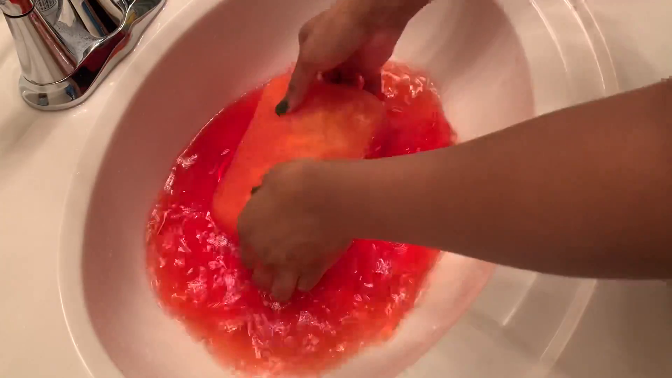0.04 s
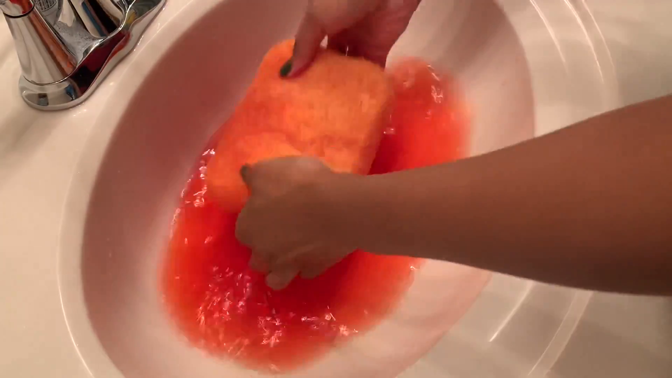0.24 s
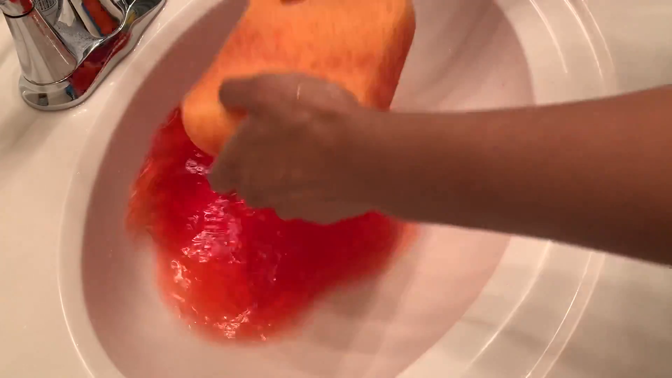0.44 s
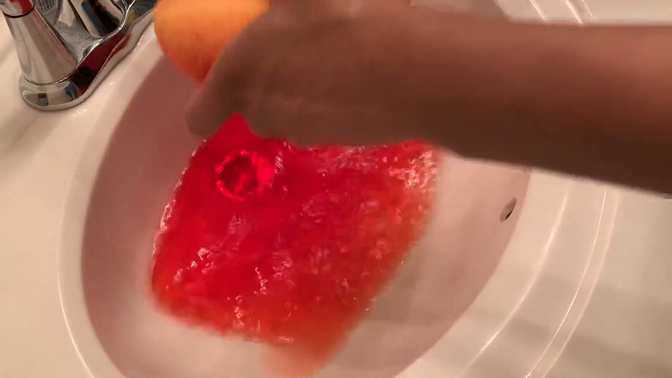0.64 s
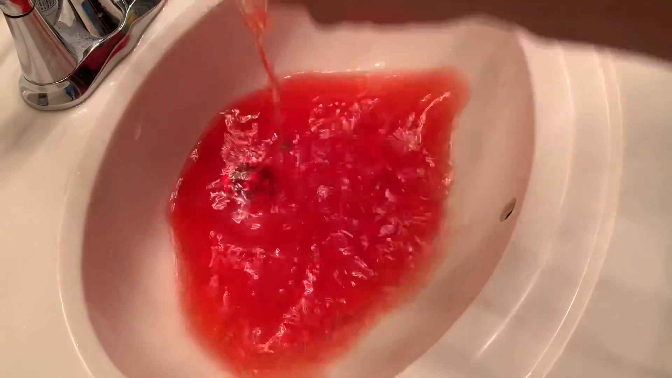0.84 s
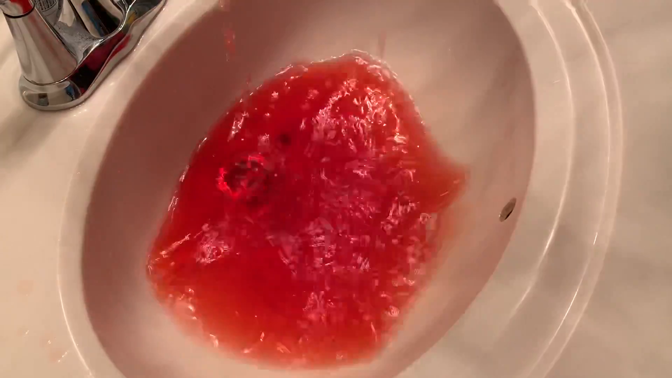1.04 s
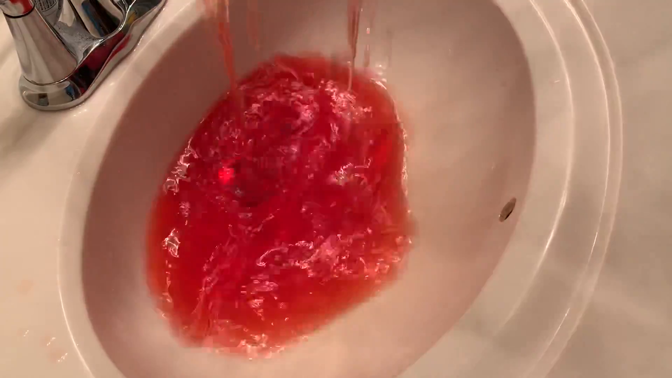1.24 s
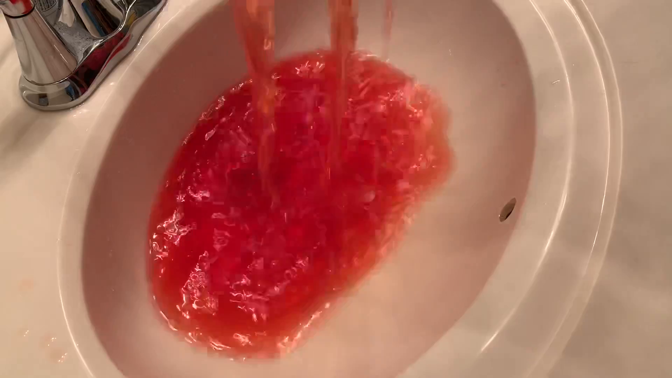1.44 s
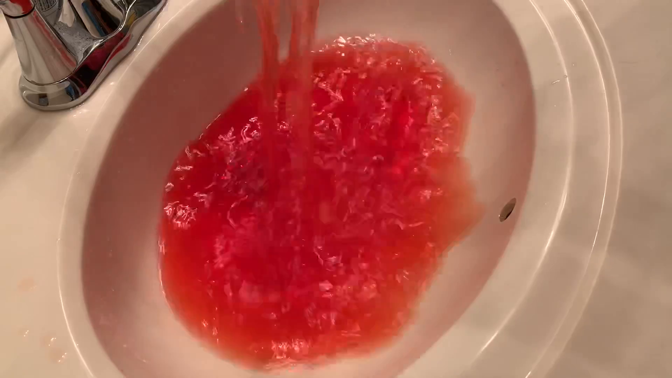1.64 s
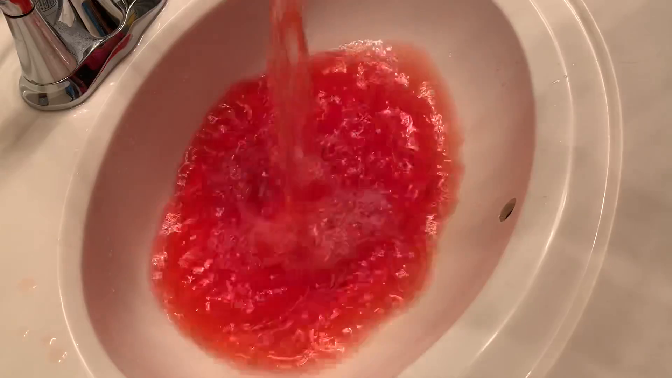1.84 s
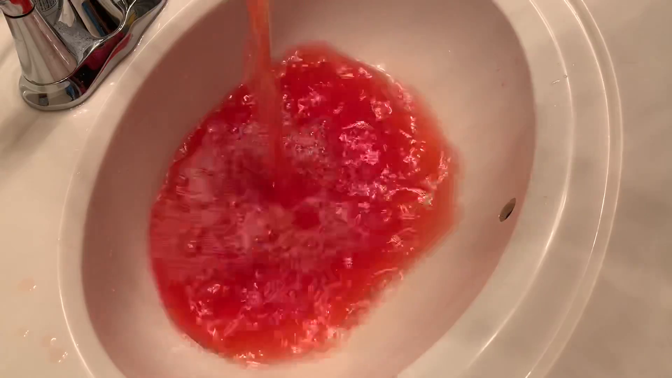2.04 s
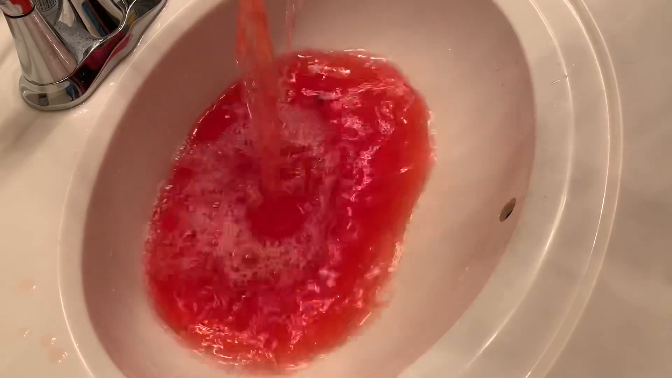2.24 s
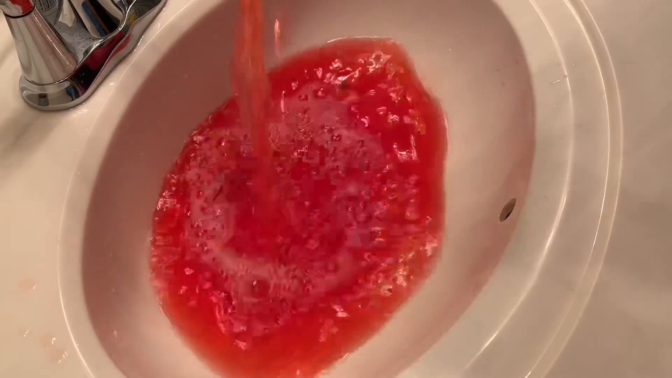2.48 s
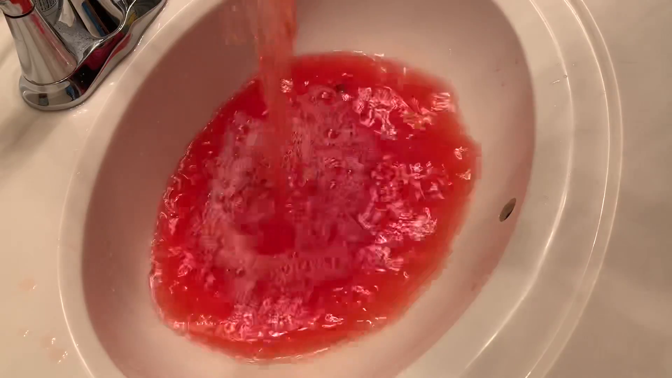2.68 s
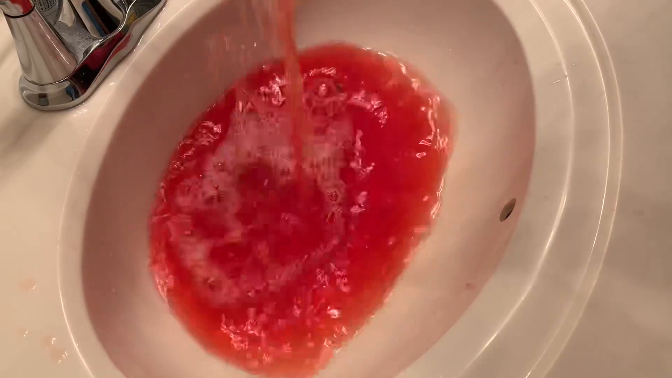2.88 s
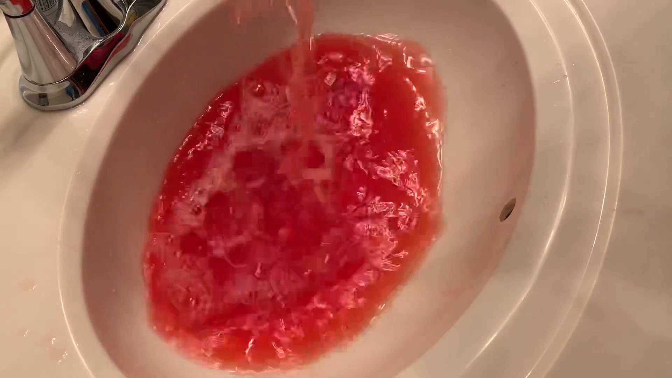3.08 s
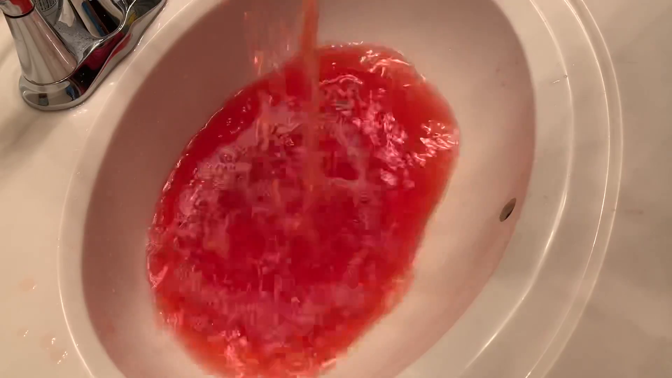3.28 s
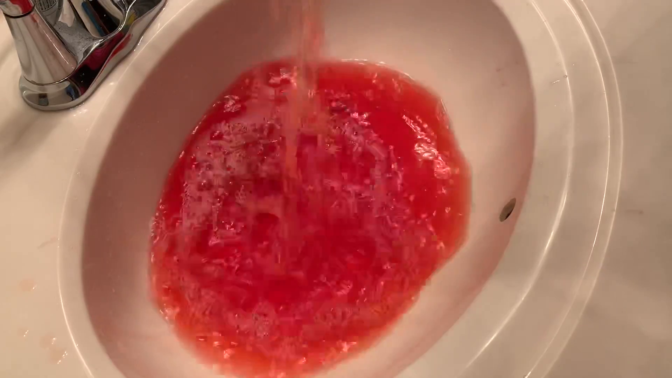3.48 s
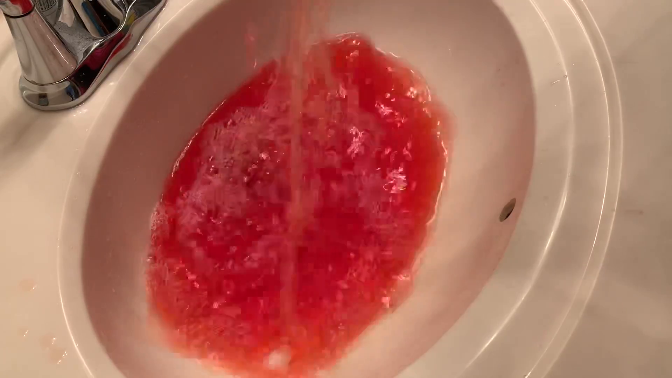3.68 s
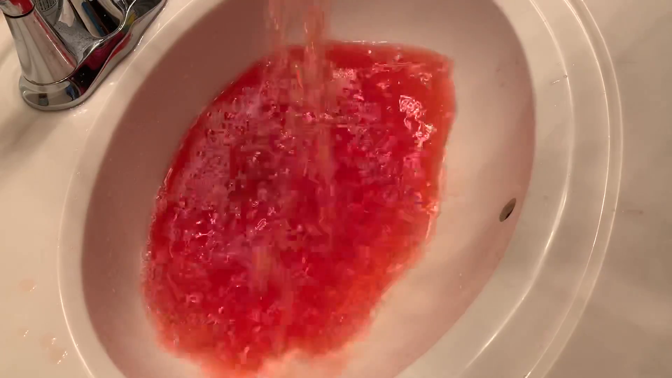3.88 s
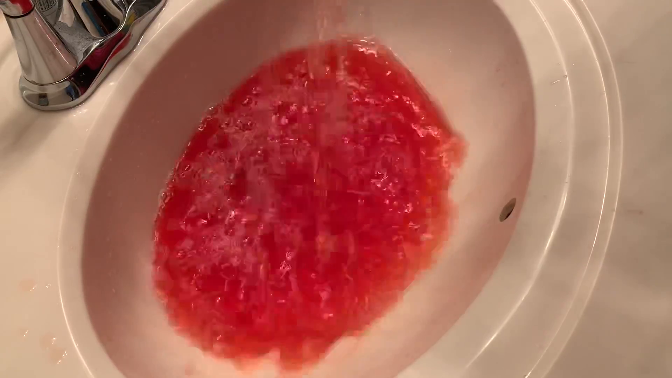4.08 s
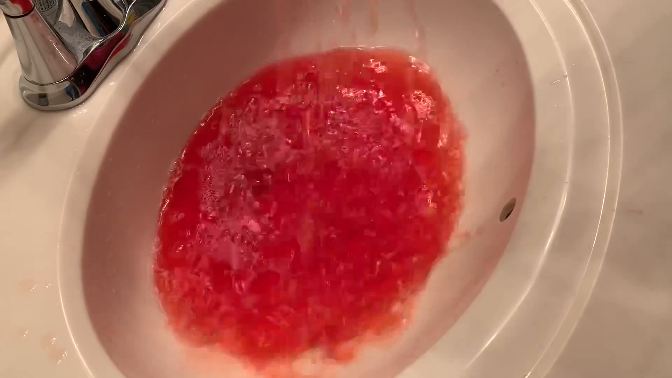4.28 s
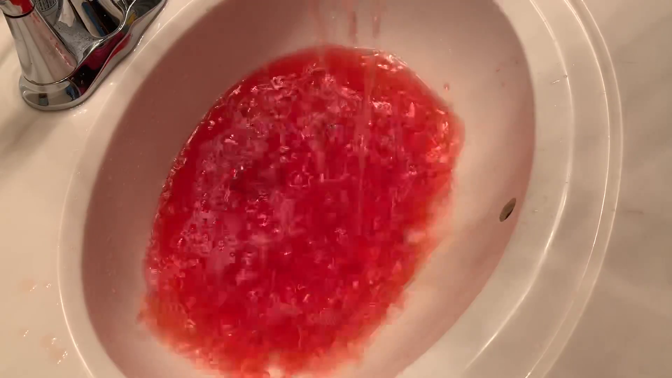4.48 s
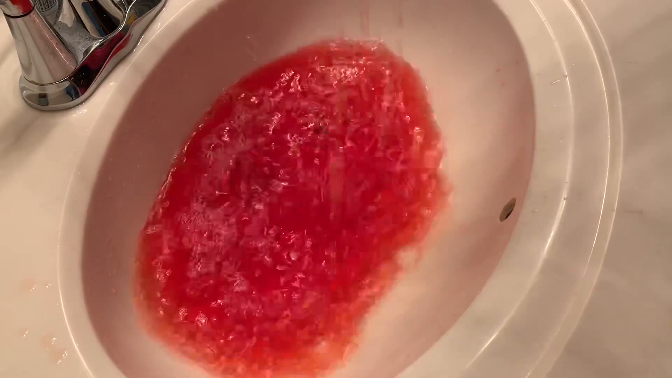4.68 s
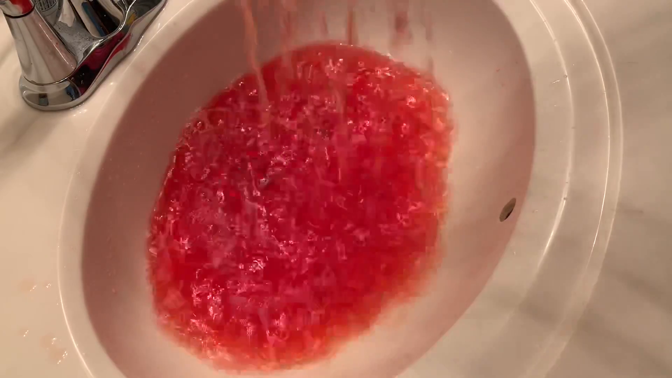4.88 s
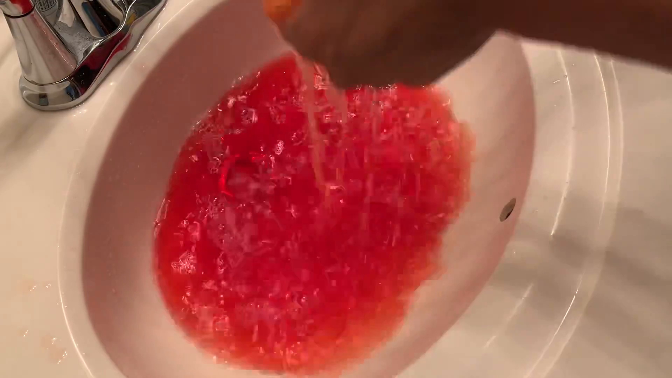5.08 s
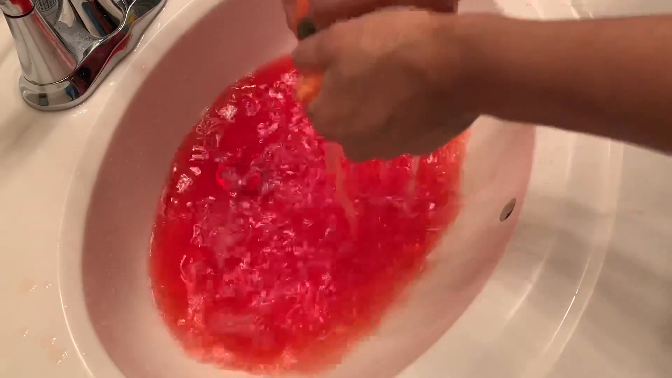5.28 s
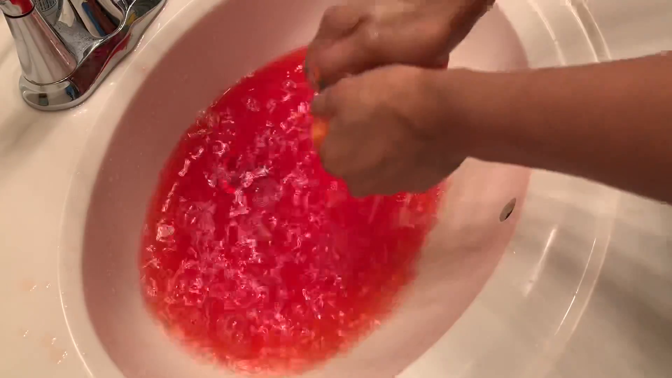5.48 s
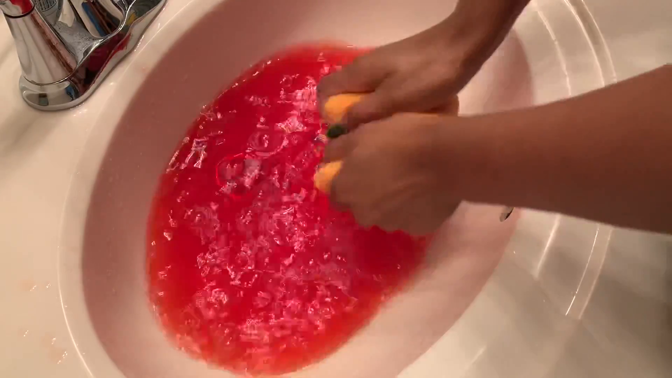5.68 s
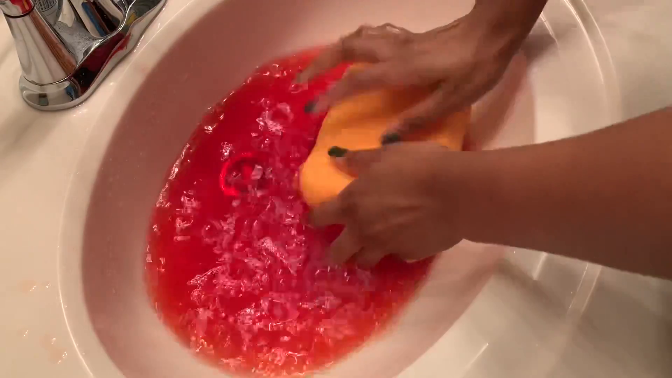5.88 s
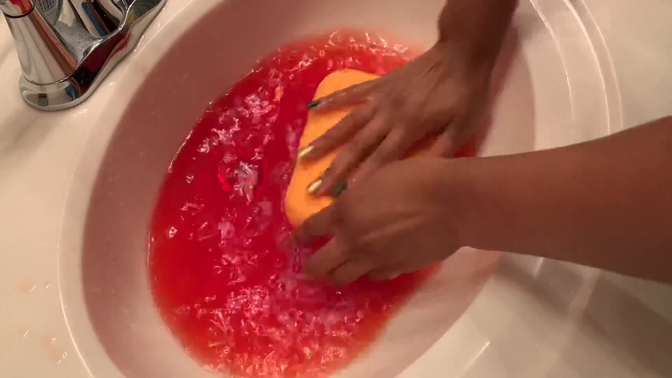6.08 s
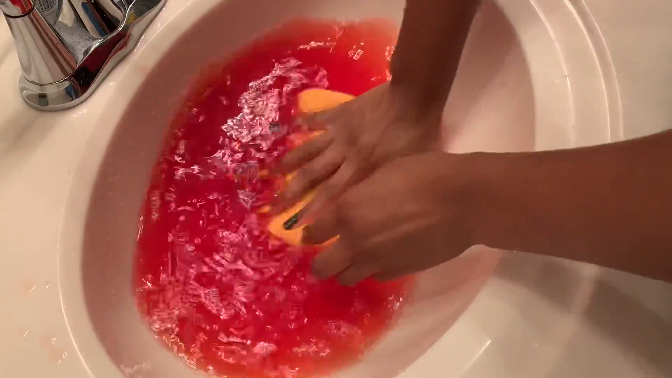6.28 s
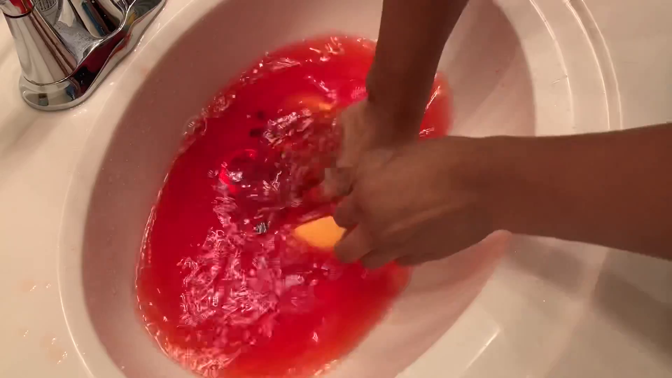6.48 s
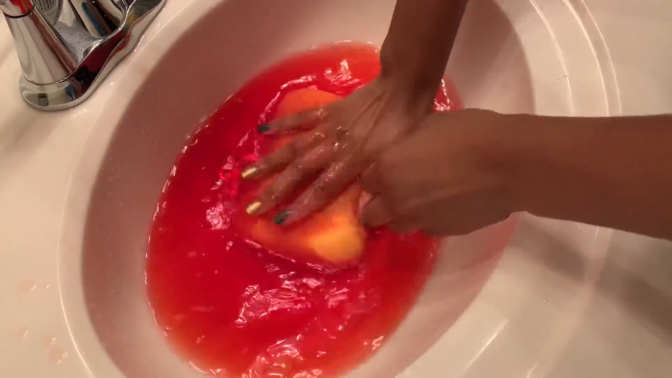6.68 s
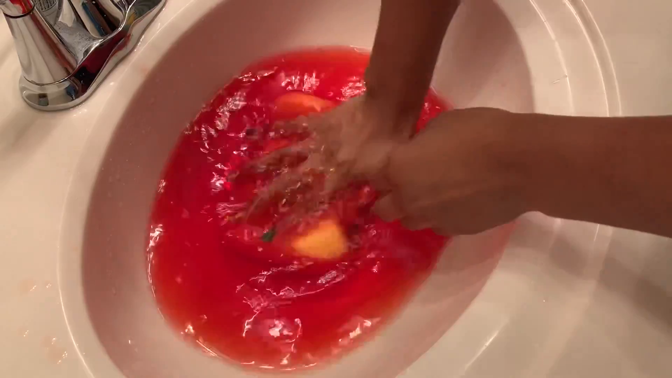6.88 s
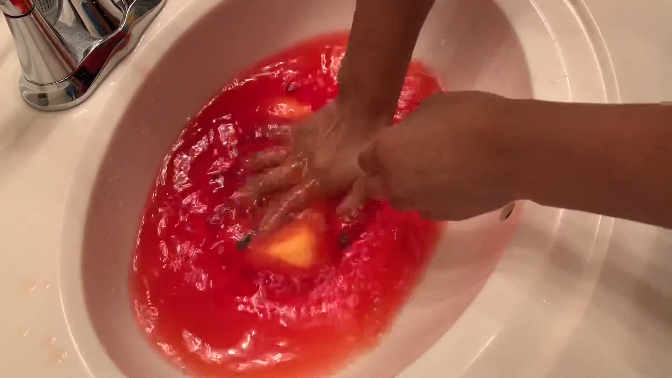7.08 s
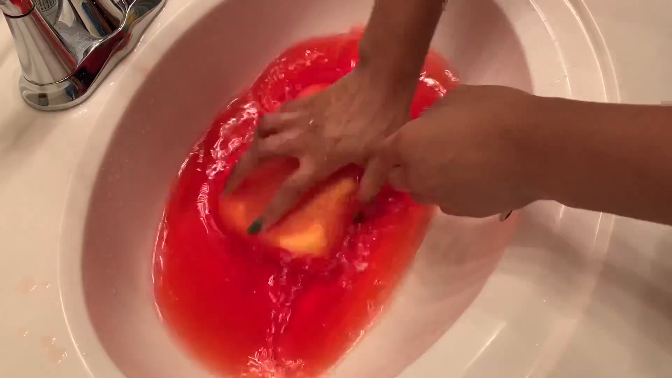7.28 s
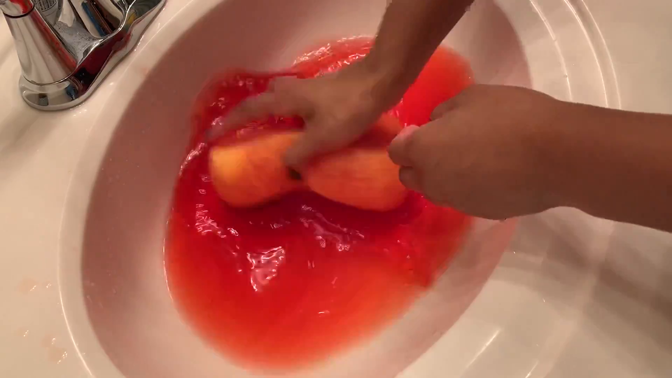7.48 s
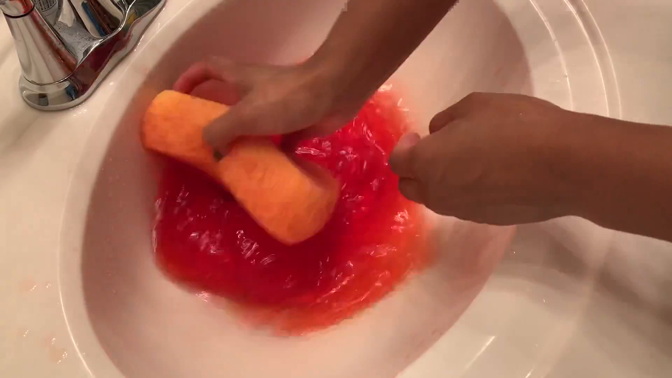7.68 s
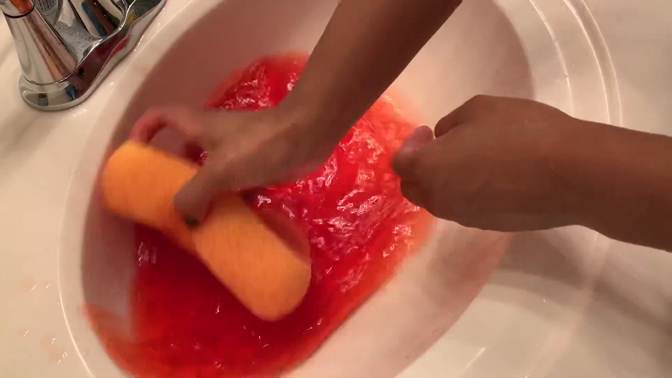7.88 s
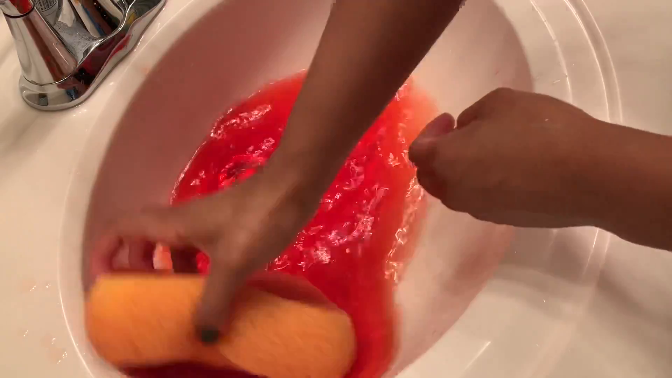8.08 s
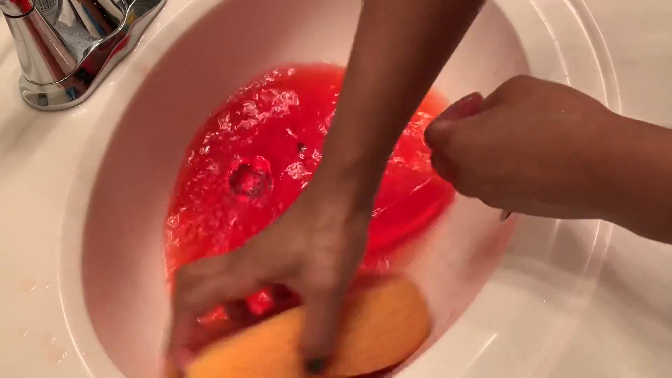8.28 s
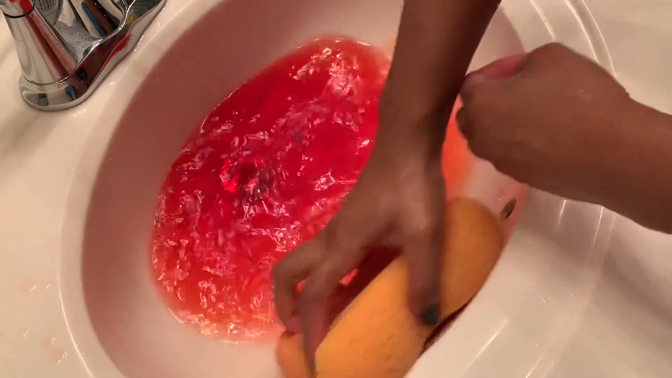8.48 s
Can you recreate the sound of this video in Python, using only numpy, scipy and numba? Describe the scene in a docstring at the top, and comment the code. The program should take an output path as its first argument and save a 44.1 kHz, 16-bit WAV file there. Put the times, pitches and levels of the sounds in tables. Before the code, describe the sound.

A quiet swish of water, a few trickles, then a sudden gush as a sponge is squeezed over a half-full basin: hollow bubbles, crackling spatter and hissing spray. The flow breaks into separate drops and rising chirpy plops. Afterward there is only soft pressing and wiping through water. The bowl rings slightly, with a short tiled reflection, heard close in stereo.

```python
"""A soaked sponge is lifted, wrung out high above a half-filled basin and pressed back into the water. Its
stream and drops trap bubbles, damped sines that mostly climb in pitch; filtered noise gives foam and spatter.
Before and after, the sponge swishes in the pool; single bubbles, slaps and bright ticks stand out. Resonators
ring the bowl and the counter, noise tails the small tiled room, over a steady hush."""
import sys
import numpy as np
from scipy import signal
from scipy.fft import rfft, irfft, next_fast_len
from scipy.io import wavfile
from scipy.ndimage import uniform_filter1d
from numba import njit

SR = 44100
rng = np.random.default_rng(int(sys.argv[2]) if len(sys.argv) > 2 else 0)


def inscribe(sig):
    """Save sig as 16-bit PCM at rate SR to the path in sys.argv[1].

    A 1-D sig is mono; a 2-D sig holds one channel per row.
    Samples are clipped to [-1, 1] before scaling.
    """
    pcm = np.round(np.clip(np.atleast_2d(sig).T, -1, 1) * 32767)
    wavfile.write(sys.argv[1], SR, pcm.astype(np.int16))


N = 376173   # length [samples]


def amp(db):
    """Amplitude factor for a level in dB."""
    return 10 ** (np.asarray(db) / 20)


def rms_one(x):
    """Scale to an RMS of 1."""
    return x / np.sqrt(np.mean(x ** 2) + 1e-20)


def coloured(x, points):
    """Filter by a table of (frequency [Hz], level [dB]), read along log frequency."""
    size = next_fast_len(N)
    hz = np.arange(size // 2 + 1) * SR / size
    table_hz, table_db = np.array(points).T
    gain_db = np.interp(np.log(hz + 1), np.log(table_hz), table_db)
    return irfft(rfft(x, size) * amp(gain_db), size)[..., :N]


def drift(rate_hz):
    """Slow chance of spread 1: noise at 200 knots per second through a one-pole lowpass."""
    knots = rng.standard_normal(int(N / SR * 200))
    r = np.exp(-2 * np.pi * rate_hz / 200)
    slow = rms_one(signal.lfilter([1], [1, -r], knots))
    return np.interp(np.linspace(200, len(knots) - 1, N), np.arange(len(knots)), slow)


def resonate(x, modes):
    """Parallel resonances (frequency [Hz], width [Hz], level [dB]), signs alternating."""
    out = 0
    for k, (hz, width, gain_db) in enumerate(modes):
        r = np.exp(-np.pi * width / SR)
        zeros = np.array([1, 0, -1]) * (1 - r * r) / 2
        poles = [1, -2 * r * np.cos(2 * np.pi * hz / SR), r * r]
        out = out + (-1) ** k * amp(gain_db) * signal.lfilter(zeros, poles, x)
    return out


@njit
def rings(n, sr, start, size, hz, t60, octaves):
    """Damped sines that swell within a cycle and glide upward ever faster as each bubble nears the surface."""
    out = np.zeros(n)
    for k in range(len(start)):
        length, phase = int(t60[k] * sr * .7), 0.
        for i in range(min(length, n - start[k])):
            u = i / (t60[k] * sr)
            pitch = hz[k] * 2 ** (octaves[k] * u * (1 + 2 * u))
            phase += 2 * np.pi * min(pitch, .45 * sr) / sr
            out[start[k] + i] += size[k] * min(phase / 6, 1.) * np.exp(-6.9 * u) * np.sin(phase)
    return out


def puff(s, peak_db, t60, edges_hz):
    """Bursts of band noise that die fast."""
    hits = np.zeros(N)
    hits[(s * SR).astype(int)] = amp(peak_db)
    decay = amp(-60 / (t60 * SR))   # per sample
    burst = signal.lfilter([1], [1, -decay], hits + 1e-18) * rng.standard_normal(N)
    return signal.sosfilt(signal.butter(2, edges_hz, "band", fs=SR, output="sos"), burst)


def hush():
    """Background hush: steady noise of fixed colour, strongest in the lows, with a narrow notch near 11.4 kHz."""
    # colour of the hush: (frequency [Hz], relative level [dB per Hz])
    hush_colour = [(20, -2), (117, 3.5), (288, -17.5), (934, -40), (4130, -43), (9330, -27.5), (10400, -20),
                   (11400, -69), (13400, -21), (15000, -51), (16400, -53.5)]
    return amp(-52.5) * rms_one(coloured(rng.standard_normal(N), hush_colour))


def swells(rows):
    """Power of the three water layers; each event swells faster than it sinks."""
    rise_share = 0.47   # of the length, the part before the loudest moment
    edge_db = 17   # lost by either end of the length
    t = np.arange(0, N, 20) / SR
    power = 0
    for s, length, *layers_db in rows:
        away = (t - s) / length / np.where(t < s, rise_share, 1 - rise_share)
        power = power + amp(np.array(layers_db)[:, None] - edge_db * away ** 2) ** 2
    return np.repeat(power, 20, axis=1)[:, :N]


def flow():
    """Levels of gurgle, splash and spray; the broken stream lands in quick lumps that all layers share."""
    # the pool left alone: (gurgle [dB], splash [dB], spray [dB])
    calm = (-89.5, -70, -74.5)
    # sponge pushed and wiped through the pool: (loudest [s], length [s], gurgle [dB], splash [dB], spray [dB])
    swishes = [(0.357, 0.2, -65, -65, -57.5), (5.828, 0.38, -70, -53, -54), (6.25, 0.75, -59.5, -59.5, -58),
               (6.438, 0.11, -51, -63, -69), (6.691, 0.2, -60, -52.5, -59),
               (6.871, 0.28, -48.5, -55.5, -70), (7.219, 0.19, -47.5, -52.5, -57.5),
               (7.486, 0.35, -65.5, -79, -61.5), (7.672, 0.34, -59, -59, -70),
               (7.812, 0.53, -70, -70, -63.5), (8.126, 0.2, -60, -50, -58.5),
               (8.477, 0.72, -79.5, -58, -59.5)]
    # runs of water off the lifted sponge: (loudest [s], length [s], gurgle [dB], splash [dB], spray [dB])
    dribbles = [(0.575, 0.1, -80, -45, -47), (0.65, 0.057, -76, -47.5, -42.5), (0.8, 1, -69, -54, -57),
                (0.99, 0.12, -41, -41.5, -54.5), (1.11, 0.22, -40.5, -45.5, -47.5)]
    # the wrung stream: (time [s], splash [dB], air dragged under, as gurgle against splash [dB])
    wring = [(1.27, -56.5, -16.5), (1.36, -40, 0), (1.47, -28.5, 0), (1.75, -32.5, 2.5), (1.9, -32, 0.5),
             (2.201, -36.5, 3), (2.55, -34.5, -0.5), (3.101, -36, 5), (3.6, -35.5, -4), (3.749, -36.5, 1.5),
             (3.849, -36, -16), (3.969, -35, -5.5), (4.301, -38, -11), (4.38, -43.5, -12.5),
             (4.5, -37.5, -10.5), (4.619, -40.5, -20), (4.88, -41.5, -39.5), (4.948, -40.5, -2.5),
             (5.1, -35, 0), (5.6, -45.5, -0.5), (5.679, -46.5, 9), (5.76, -62.5, -1)]
    s, level_db, air_db = np.transpose(wring)
    t = np.arange(N) / SR
    level_db = np.interp(t, s, level_db, -200, -200)   # silent outside the wringing
    air_db = np.interp(t, s, air_db)
    spray_db = -3 - 0.12 * air_db   # a stream that drags no air under spatters more
    wrung = level_db + np.array([air_db, 0 * t, spray_db])
    power = amp(wrung) ** 2 + swells(dribbles + swishes) + amp(calm)[:, None] ** 2
    gurgle_db, splash_db, spray_db = 10 * np.log10(power)
    lumps = drift(21.0)
    lumps = lumps - uniform_filter1d(lumps, size=4000)   # no slow surges
    flicker = 1.93 * drift(34.0)   # the spray's own
    return gurgle_db + 0.47 * lumps, splash_db + 1.66 * lumps, spray_db + 2.9 * lumps + flicker


def fullness(level_db):
    """Share of the full rate of bubbles, .12 to 1: below full_db the flow thins to single drops."""
    full_db = -36
    return np.clip(amp(uniform_filter1d(level_db, size=6000) - full_db), .12, 1)


def swarm(level_db, low_hz, high_hz, cycles, spread_db, rise, shrink, count):
    """Bubbles born at random, sizes uneven; a thin flow makes fewer and smaller ones. Unit power at 0 dB."""
    when, pitch, luck, life, lot = rng.random((count, 5)).T
    start = (when * N).astype(np.int64)
    share = fullness(level_db)[start]
    hz = low_hz * (high_hz / low_hz) ** pitch * 2 ** (shrink * (1 - share))   # smaller rings higher
    t60 = cycles / hz * 3 ** (life - .5)
    size = amp(-spread_db * np.log(luck + 0.012))
    size = size / np.sqrt(np.sum(size ** 2 * t60) * SR / (4 * np.log(1000) * N))
    size = size * (lot < share) / np.sqrt(share)   # fewer bubbles, same power
    return rings(N, SR, start, size * amp(level_db[start]), hz, t60, rise * life)


def stream(gurgle_db, splash_db, spray_db):
    """One strand: big air pockets gurgle, middle bubbles splash, tiny ones and churned foam hiss."""
    # colours of three layers: (frequency [Hz], level [dB])
    splash_colour = [(150, -16.5), (400, -10.5), (700, 5), (1300, -0.5), (2000, -2.5), (3200, 4),
                     (5000, -2.5), (7000, -15)]
    spray_colour = [(2000, -13), (4000, -23), (6000, 3.5), (8500, 9.5), (11000, 2.5), (14000, 9),
                    (16000, -4.5)]
    slosh_colour = [(90, -13.5), (200, -2.5), (500, -4), (900, -2), (2500, -29.5)]
    lifted_s, lowered_s = .52, 5.7
    t = np.arange(N) / SR
    # with the sponge under water little air is trapped and the water only swishes
    under = (t < lifted_s) | (t > lowered_s)
    gurgle = swarm(gurgle_db - 3.5 - 30 * under, 295.0, 592.5, 24.7, 3.14, 0.59, 0.403, count=1600)
    splash = swarm(splash_db - 0.5 - 5 * under, 807.5, 6010, 21.0, 2.7, 0.804, 0.886, count=3600)
    spray = swarm(spray_db - 6 * under, 3520, 13700, 8.6, 4.7, 1.0, 0.15, count=8000)
    patches = amp([2.7 * drift(4.7) for _ in range(3)])
    crackle = amp(2.05 * rng.exponential(1, (3, N // 64 + 1)) - 3.5)   # a new level every 64 samples
    foam = rng.standard_normal((3, N)) * patches * np.repeat(crackle, 64, axis=1)[:, :N]
    splash = coloured(splash + amp(splash_db - 6.5 + 3.3 * under) * foam[0], splash_colour)
    spray = coloured(spray + amp(spray_db - 4.0) * foam[1], spray_colour)
    slosh = amp(gurgle_db - 11.0 + 7.8 * under) * rms_one(coloured(foam[2], slosh_colour))
    return gurgle + splash + spray + slosh


def thrum(splash_db):
    """The counter shakes under the falling water: resonant noise that follows the smoothed splash level."""
    # resonances of the counter: (frequency [Hz], width [Hz], level [dB])
    counter = [(62.1, 4.3, 1.5), (126, 25, -4.5)]
    level_db = uniform_filter1d(splash_db, size=8000) - 9.5
    return amp(level_db) * rms_one(resonate(rng.standard_normal(N), counter))


def ticks():
    """Fine droplets on the bowl: each a short bright ring in a wide click."""
    # droplets: (time [s], level before the ring and click trims [dB])
    tick_rows = [(0.127, -43), (.445, -41.5), (.582, -37), (0.654, -26), (2.2044, -22), (2.249, -28.5),
                 (2.2928, -15.5), (2.338, -17.5), (2.505, -19.5), (2.6535, -19.5), (3.448, -18),
                 (3.606, -23.5), (3.6277, -16.5), (3.799, -20.5), (3.868, -20.5), (3.993, -21),
                 (4.005, -19.5), (4.097, -12), (4.211, -19), (4.397, -20.5), (4.648, -22.5), (4.711, -18),
                 (4.959, -23.5), (5.192, -20.5), (5.4521, -23), (5.864, -37)]
    s, peak_db = np.transpose(tick_rows)
    centre_hz, t60_s = 9470, 0.0037
    hz = centre_hz * (1 + 0.18 * (rng.random(len(s)) - .5))
    ring = rings(N, SR, (s * SR).astype(np.int64), amp(peak_db + 12.5), hz, t60_s + 0 * s, 0 * s)
    return ring + puff(s, peak_db + 6.5, 0.00087, [2500, 16000])


def plops():
    """Single large bubbles snap off and climb as they ring; the deep ones beat against a smaller twin."""
    # deep in the pool: (time [s], level before trims [dB], starting pitch [Hz], t60 before limits [s])
    deep_rows = [(0.535, -43.5, 1190, 0.033), (0.575, -35.5, 1760, 0.058), (0.631, -42.5, 1310, 0.073),
                 (0.653, -41.5, 720, 0.094), (0.731, -42, 1710, 0.056), (0.741, -38.5, 1330, 0.065),
                 (0.773, -33.5, 2620, 0.029), (0.881, -34.5, 1945, 0.043), (0.93, -44, 1460, 0.029),
                 (0.976, -39.5, 541, 0.12), (1.027, -38.5, 486, 0.19), (1.116, -18, 670, 0.018),
                 (1.301, -28.5, 1080, 0.054), (1.364, -35, 515, 0.14), (1.501, -14, 520, 0.061),
                 (1.585, -18, 395, 0.063), (1.701, -17.5, 414, 0.06), (1.746, -20.5, 492, 0.093),
                 (1.911, -17, 533, 0.054), (1.974, -21.5, 1230, 0.053), (1.953, -12, 403, 0.029),
                 (2.003, -18, 370, 0.035), (2.073, -20, 398, 0.0074), (2.326, -14, 350, 0.026),
                 (2.358, -20.5, 350, 0.075), (2.438, -13.5, 412, 0.036), (2.681, -15.5, 383, 0.033),
                 (2.903, -14.5, 361, 0.058), (3.063, -20, 460, 0.13), (3.451, -13.5, 370, 0.043),
                 (3.528, -18, 391, 0.062), (3.633, -25.5, 490, 0.22), (3.725, -24, 340, 0.067),
                 (3.891, -30.5, 513, 0.099), (3.946, -16, 546, 0.041), (4.072, -19.5, 840, 0.103),
                 (4.097, -22, 626, 0.0463), (4.183, -25, 830, 0.063), (4.244, -15, 500, 0.041),
                 (4.34, -32, 968, 0.17), (4.419, -22, 758, 0.18), (4.529, -42, 543, .29),
                 (4.65, -38.5, 1537, 0.063), (4.667, -31.5, 876, 0.12), (4.723, -29, 744, 0.11),
                 (4.908, -20.5, 652, 0.16), (5.087, -17.5, 460, 0.041), (5.126, -33, 1010, 0.088),
                 (5.19, -24.5, 1180, 0.033), (5.268, -18.5, 480, 0.052), (5.383, -34, 497, 0.38),
                 (5.454, -24, 579, 0.078), (5.51, -36, 485, 0.22), (5.619, -34, 556, 0.086),
                 (5.677, -27, 700, 0.04), (5.891, -40.5, 836, 0.1), (6.47, -48.5, 1080, 0.11),
                 (6.862, -37, 224, 0.15), (7.229, -37.5, 694, 0.063), (7.545, -42.5, 672, 0.12),
                 (7.627, -40, 1880, 0.04), (8.104, -20.5, 1555, 0.018), (8.444, -38, 1700, 0.05)]
    # breaking the surface and sweeping upward: the same columns
    chirp_rows = [(3.74, -21.5, 780, 0.087), (3.856, -22, 950, 0.052), (4.0, -27.5, 540, .08),
                  (4.111, -18, 870, 0.029), (4.262, -16.5, 730, 0.04), (4.453, -26.5, 963, 0.22),
                  (4.783, -24, 1590, 0.018), (4.932, -24, 1560, 0.026), (5.013, -26.5, 1110, 0.047),
                  (6.742, -31.5, 990, 0.0096), (7.515, -40.5, 590, 0.13), (7.603, -42, 627, 0.14),
                  (7.656, -47, 1094, 0.078)]
    s, peak_db, hz, t60 = np.transpose(deep_rows + chirp_rows)
    t60 = np.clip(t60, .01, .3)
    deep = np.arange(len(s)) < len(deep_rows)   # only these tear in two
    pace = np.where(deep, 2.2, 10)   # the main bubble's first climb [octaves/s]
    late, apart = rng.random((len(s), 2)).T
    main = rings(N, SR, (s * SR).astype(np.int64), amp(peak_db + 4.0), hz, t60, pace * t60)
    twin_start = ((s + .15 * late * t60) * SR).astype(np.int64)
    twin_hz = hz * (1 + 0.14 * (.5 + apart))
    twin = rings(N, SR, twin_start, amp(peak_db - 0.5) * deep, twin_hz, .7 * t60, pace * t60)
    snap = puff(s, peak_db - 3, 0.01, [300, 2600])
    return main + twin + snap


def slaps():
    """Each landing drop: a crack, a short ring, a scatter of droplets after it and a burst of fine spray."""
    # drops on the surface: (time [s], level before trims [dB], ring pitch [Hz], fine spray before trim [dB])
    slap_rows = [(0.5368, -40, 6670, 0.5), (0.642, -24.5, 5270, -21), (0.7157, -33, 2680, -19),
                 (0.8072, -29.5, 2600, -3.5), (0.98, -30.5, 4400, -23), (1.075, -26, 3520, -17),
                 (1.136, -21, 4570, -20), (1.187, -35.5, 4850, -12), (1.226, -24.5, 4420, -7),
                 (1.3005, -29, 4900, 0), (1.359, -15, 5000, -35.5), (1.451, -16, 3950, -30),
                 (1.47, -16, 1440, -27), (1.9, -17, 2050, -7), (2.027, -17.5, 2620, -8),
                 (2.099, -24, 4800, -13), (2.595, -6, 7260, -10.5), (2.672, -17, 2140, -10),
                 (2.721, -17.5, 2770, -18), (2.893, -19.5, 2120, -1), (2.9487, -16, 3150, -7.5),
                 (3.083, -17, 2150, -16), (3.1536, -7, 6000, -34), (3.8883, -16, 2600, -1),
                 (3.9551, -14, 3150, -7), (4.0543, -15.5, 3870, -9.5), (4.1838, -20.5, 3120, 2),
                 (4.5301, -15.5, 2260, -16.5), (4.811, -15.5, 5000, -25), (4.847, -19.5, 5100, -2),
                 (4.816, -9, 3000, -31), (4.989, -20, 3970, -13), (5.005, -16, 3070, -10),
                 (5.094, -15, 3620, -29), (5.321, -22, 3650, 0), (5.34, -17, 3520, -11),
                 (5.407, -20, 3100, -9), (5.675, -27.5, 3040, -12), (5.8463, -38, 3220, -9),
                 (6.2868, -31, 3020, -9), (6.679, -38, 3130, -18), (6.69, -34.5, 3570, -10),
                 (6.858, -30, 2030, -30), (7.226, -22.5, 2960, -15), (7.229, -24.5, 2070, -34),
                 (8.079, -49.5, 4150, 10.5), (8.0951, -22.5, 2920, -13), (8.139, -33.5, 4170, -10),
                 (8.191, -38.5, 3420, -38)]
    s, peak_db, hz, spray_db = np.transpose(slap_rows)
    ring = rings(N, SR, (s * SR).astype(np.int64), amp(peak_db + 5.0), hz, 20.8 / hz, 0.17 + 0 * s)
    late, pitch = rng.random((len(s), 2, 10)).transpose(1, 0, 2)   # ten droplets each
    tone = np.clip(hz[:, None] * 2 ** (2.6 * (pitch - .55)), 400, 9000).ravel()
    start = np.minimum((s[:, None] + 0.027 * late ** 2) * SR, N - 1).astype(np.int64).ravel()
    size = amp(peak_db[:, None] - 14.5 - 6.2 * late).ravel()   # later ones are fainter
    droplets = rings(N, SR, start, size, tone, 10.0 / tone, 0.43 + 0 * tone)
    crack = puff(s, peak_db - 9.0, 0.0033, [600, 5500])
    fine_spray = puff(s, peak_db + spray_db + 13.5, 0.0038, [5500, 16000])
    return ring + droplets + crack + fine_spray


def in_bowl(water):
    """The bowl rings along with the water: resonances added to it."""
    # resonances of the bowl: (frequency [Hz], width [Hz], level [dB])
    bowl_modes = [(319, 7.1, 6.5), (425.4, 9.3, 13), (512.5, 9.3, 4), (587, 24, 8.5), (1594, 710, -2.5)]
    return water + resonate(water, bowl_modes)


def room(x):
    """A quick scatter inside the bowl, then a faint tail off the tiles; unlike in the two channels."""
    # echo against direct sound: (frequency [Hz], level [dB])
    echo_colour = [(100, -16), (400, -12), (1000, -7), (2000, 3), (4500, 11), (8000, -4), (15000, -4)]
    bowl_t60_s, room_t60_s, room_db = .03, .18, -14
    t = np.arange(int(.3 * SR)) / SR
    fade = amp(-60 * t / bowl_t60_s) + amp(room_db - 60 * t / room_t60_s)
    tails = rng.standard_normal((2, len(t))) * fade * (t > .0004)
    tails = tails / np.sqrt(np.sum(tails ** 2, axis=1, keepdims=True))
    return signal.fftconvolve(coloured(x, echo_colour)[None], tails, axes=1)[:, :N]


def ports(x):
    """The direct sound reaches the left microphone port a little later: a phase slope delays it."""
    left_lag_s = .000221
    size = next_fast_len(N)
    hz = np.arange(size // 2 + 1) * SR / size
    late = np.exp(-2j * np.pi * hz * left_lag_s)
    return np.array([irfft(rfft(x, size) * late, size)[:N], x])


def scene():
    """Strands land at different spots of the bowl, each with echoes of its own, over a steady hush."""
    levels = flow()
    spots = [stream(*levels), stream(*levels), ticks() + plops() + slaps()]
    spots = [in_bowl(water) for water in spots]
    spots.append(hush() + thrum(levels[1]))
    return amp(-5.0) * (ports(sum(spots)) + sum(room(x) for x in spots))


def record(dry):
    """The two microphone ports differ in colour; steep cut at the top."""
    # port colour: (frequency [Hz], left minus right [dB])
    tilt = [(60, 2.5), (550, 2), (2500, 4), (8000, -.5)]
    cutoff_hz = 16550
    half = np.array(tilt) * [1, .5]   # half the difference to each port
    pair = np.array([coloured(dry[0], half), coloured(dry[1], half * [1, -1])])
    return signal.sosfilt(signal.cheby2(12, 70, cutoff_hz, fs=SR, output="sos"), pair)


dry = scene()
out = record(dry)
inscribe(out)
```